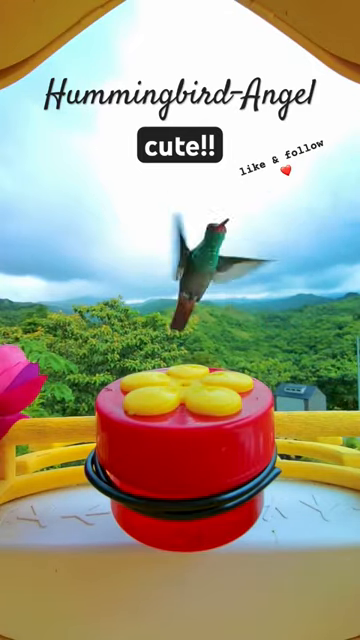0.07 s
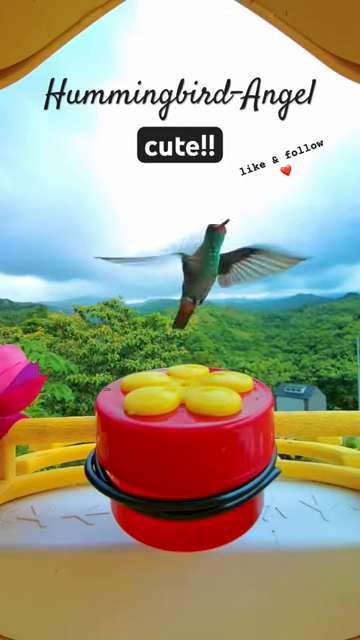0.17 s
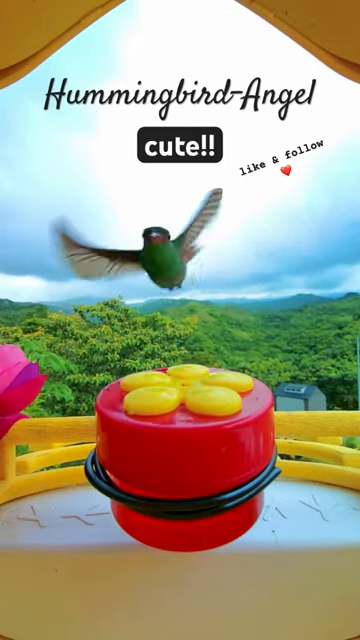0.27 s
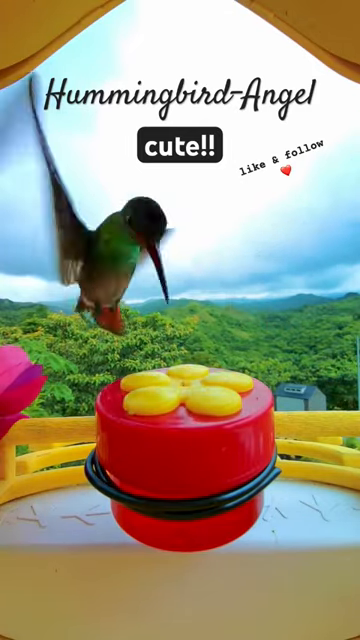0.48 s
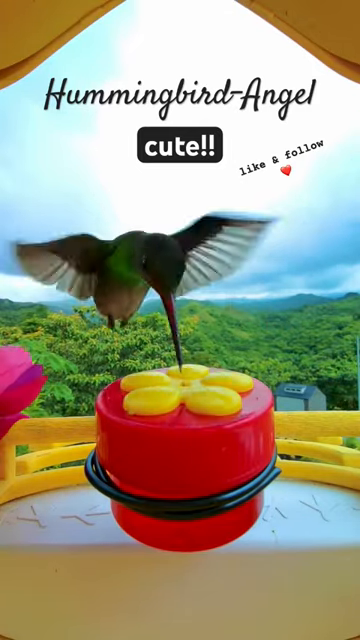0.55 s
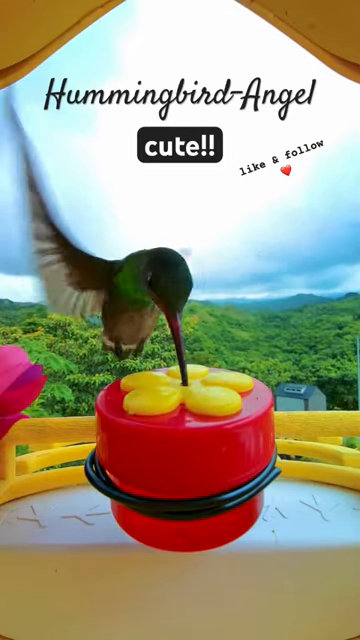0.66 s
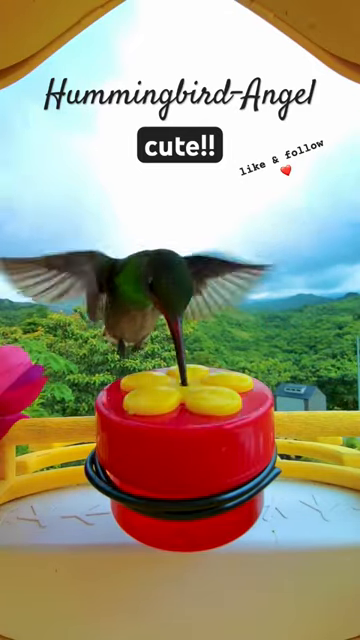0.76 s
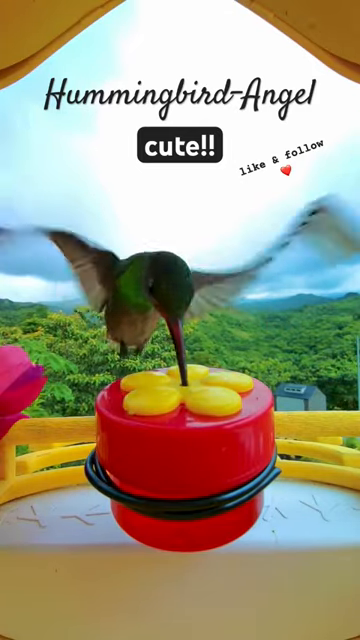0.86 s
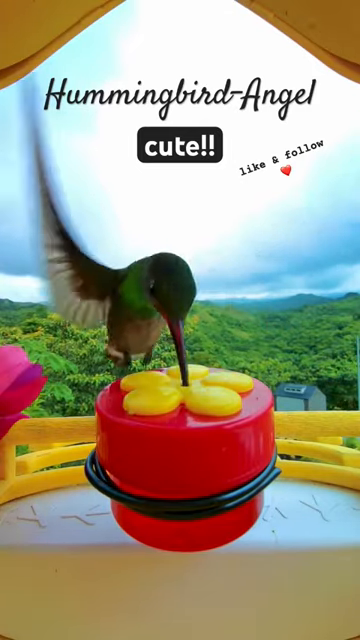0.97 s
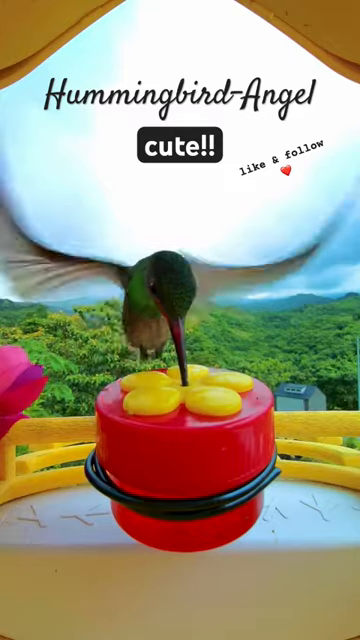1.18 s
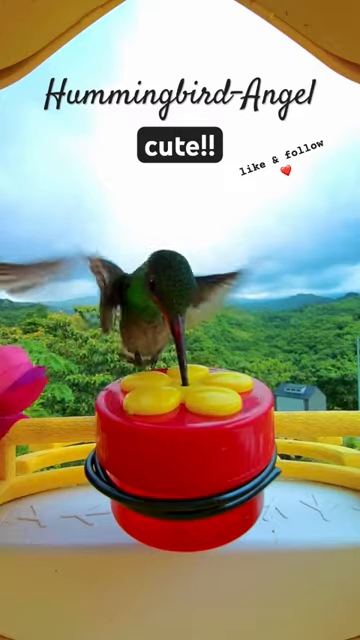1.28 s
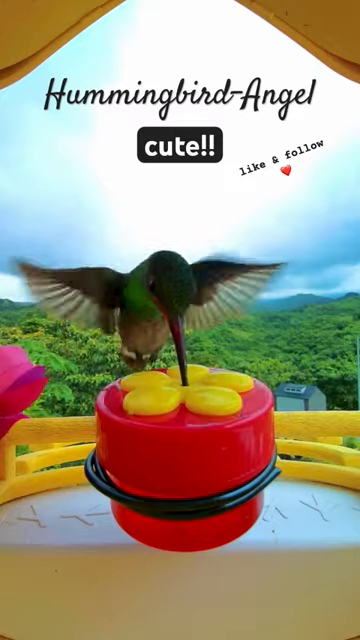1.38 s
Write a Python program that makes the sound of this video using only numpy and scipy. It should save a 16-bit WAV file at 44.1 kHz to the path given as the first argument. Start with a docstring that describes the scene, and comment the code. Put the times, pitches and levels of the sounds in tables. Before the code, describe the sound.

Hummingbird wings hum in fast, low, fluttering thumps close up, with one short sharp chirp early on

```python
"""Outdoors at a feeder, a small microphone hears faint distant hiss throughout.
A hummingbird flies in, its wingstrokes thumping the air about 33 times a second in a swirl of downwash.
On the way in comes a short faint hiss, then one falling chirp: harmonics shaped by the throat, with
noise for its rough end. A diffuse tail from the trees rings on briefly under a dying haze, while
the bird hovers right in front of the microphone, each stroke a short ringing push and pull of air."""
import sys
import numpy as np
from scipy import signal
from scipy.fft import rfft, irfft
from scipy.io import wavfile
from scipy.ndimage import uniform_filter1d

SR = 44100
rng = np.random.default_rng(int(sys.argv[2]) if len(sys.argv) > 2 else 0)


def volts_from_db(level):
    """Convert decibel levels to linear amplitude ratios."""
    exponent = np.asarray(level, float) / 20
    return 10 ** exponent


def store_pcm(level_fs):
    """Save levels as 16-bit WAV."""
    pcm = np.round(np.clip(level_fs, -1, 1) * 32767).astype(np.int16)
    wavfile.write(sys.argv[1], SR, np.atleast_2d(pcm).T)


N = 63945  # samples, 1.45 s


def unit(x):
    """Scale to an rms of 1."""
    return x / np.sqrt(np.mean(x ** 2))


def shape_db(points, hz):
    """Read a spectrum (frequency [Hz], level [dB]) along a log-frequency axis."""
    p = np.array(points, float)
    return np.interp(np.log(np.maximum(hz, 1)), np.log(p[:, 0]), p[:, 1])


def colour(x, points):
    """Filter by a spectrum (frequency [Hz], level [dB])."""
    hz = np.arange(len(x) // 2 + 1) * SR / len(x)
    return irfft(rfft(x) * volts_from_db(shape_db(points, hz)), len(x))


def resonance(x, hz, width_hz):
    """A single resonant peak."""
    return signal.lfilter(*signal.iirpeak(hz, hz / width_hz, fs=SR), x)


def butter(x, order, hz, kind):
    """Butterworth filter run both ways, so that it shifts nothing in time."""
    return signal.sosfiltfilt(signal.butter(order, hz, kind, fs=SR, output="sos"), x)


def walk(rate):
    """Random levels held for 1 / rate seconds, then smoothed twice; rms of 1."""
    hold = int(SR / rate)
    steps = np.repeat(rng.standard_normal(N // hold + 1), hold)
    return unit(uniform_filter1d(uniform_filter1d(steps, hold), hold)[:N])


# Spectrum of the open air around the feeder: (frequency [Hz], relative level [dB])
AIR_SPECTRUM = [(30, -4), (100, -8.5), (300, -9.5), (700, -3), (1500, -9.5), (3000, -10), (5500, -9.5),
                (9000, -11.5), (15000, -14.5)]


def air(t):
    """Smooth distant hiss: coloured noise, a little louder once the bird is near."""
    level_db, near_rise_db, waver_db = -69.5, 1.5, .5
    near = np.clip((t - .2) / .1, 0, 1)
    hiss = unit(colour(rng.standard_normal(N), AIR_SPECTRUM))
    return hiss * volts_from_db(level_db + near_rise_db * near + waver_db * walk(8.4))


def surroundings(voice, t):
    """The chirp returns from the trees as a diffuse fading tail, with a broad haze that dies away."""
    tail_start_s, tail_db, tail_t60_s = 0.06, -39, 0.66
    haze_db, haze_t60_s = -57, 1  # haze level at the end of the chirp
    echoes = rng.standard_normal(N) * volts_from_db(-60 * t / tail_t60_s) * (t > tail_start_s)
    echoes = volts_from_db(tail_db) * echoes / np.linalg.norm(echoes)
    tail = signal.fftconvolve(voice, echoes)[:N]
    since_end = t - CHIRP_COURSE[-1][0]
    haze = unit(colour(rng.standard_normal(N), AIR_SPECTRUM)) * volts_from_db(haze_db - 60 * since_end / haze_t60_s)
    return tail + haze * (t > CHIRP_COURSE[1][0])


# Faint hiss leading into the chirp: (time [s], level [dB])
LEAD_IN_LEVEL = [(.2185, -75), (.2205, -49.5), (.2245, -54), (.2285, -46.5), (.2305, -57.5), (.2355, -53),
                 (.2370, -77)]


def lead_in(t):
    """A short faint hiss just before the chirp: noise through two broad resonances."""
    time, level_db = np.array(LEAD_IN_LEVEL).T
    noise = rng.standard_normal(N)
    hiss = unit(resonance(resonance(noise, 4600, 2500), 5500, 5000)) + .15 * noise
    return volts_from_db(np.interp(t, time, level_db, left=-120, right=-120)) * hiss


# Course of the chirp:
# (time [s], pitch [Hz], level [dB], roughness [0-1], gain of the treble [dB])
CHIRP_COURSE = [(.2355, 1560, -55.5, .4, -12), (0.2362, 1562, -27, .4, -15),
                (.2400, 1554, -21.5, .4, -12.5), (.2408, 1260, -21.5, .45, -15),
                (.2450, 1160, -21, .3, -13), (.2500, 1111, -19.5, .2, -6), (.2540, 1063, -20, .2, 3),
                (0.254, 1062, -25.5, 0.6, 0.5), (.2610, 1033, -26, 0.6, 6.5), (.2660, 953, -30.5, .8, 1),
                (.2700, 1104, -35, .8, 0.5), (.2750, 1120, -27.5, .7, -0.5), (.2810, 1110, -34.5, .8, 4),
                (.2840, 1100, -47.5, .8, -1), (.2860, 1100, -58, .8, 1)]
# Resonances of the throat: (frequency [Hz], relative level [dB])
THROAT_SPECTRUM = [(400, -62.5), (750, -26.5), (1000, -15.5), (1550, -23.5), (2200, -34), (2700, -27),
                   (3200, -28.5), (3700, -28), (4500, -7.5), (5500, 0), (6300, -7), (7000, -21.5),
                   (7800, -27.5), (10500, -27), (13500, -32), (16000, -50.5)]


def chirp(t):
    """A falling harmonic stack shaped by the throat; roughness trades the lines for a grainy rasp."""
    treble_hz = 7600
    beak_closes_s, closing_s = 0.2593, .004
    time, *columns = np.array(CHIRP_COURSE).T
    hz, level_db, rough, treble_db = [np.interp(t, time, column) for column in columns]
    rough = np.clip(rough, 0, 1)

    phase = 2 * np.pi * np.cumsum(hz * (1 + .006 * walk(400))) / SR  # slightly unsteady pitch
    tone = np.zeros(N)
    for k, start in enumerate(rng.uniform(0, 2 * np.pi, 13), 1):
        line_db = shape_db(THROAT_SPECTRUM, k * hz) + 1.5 * walk(300)  # each harmonic flickers
        tone += volts_from_db(line_db) * np.sin(k * phase + start)
    rasp = unit(colour(rng.standard_normal(N), THROAT_SPECTRUM)) * volts_from_db(1.2 * walk(500))
    voice = np.sqrt(2 - 2 * rough ** 2) * tone + rough * rasp

    treble = butter(voice, 4, treble_hz, "high")
    voice = voice + treble * (volts_from_db(treble_db) - 1)
    # the beak closes and this band [Hz] fades
    shoulder = butter(voice, 2, (5900, 7420), "band")
    voice = voice - 0.81 * shoulder * np.clip((t - beak_closes_s) / closing_s, 0, 1)
    sounding = (t > time[0]) * (t < time[-1])
    return sounding * volts_from_db(level_db) * voice


# Wingstrokes as the bird nears and hovers: (time [s], nominal level [dB], nominal thump pitch [Hz])
STROKES = [(0.0255, -64.5, 200), (0.12, -64, 190), (0.2128, -62.5, 213), (0.239, -62.5, 189),
           (0.268, -45, 170), (0.293, -41.5, 250), (0.3177, -34.5, 223), (0.3471, -40, 222),
           (.4090, -43.5, 185), (0.4379, -44, 219), (0.5008, -51, 165), (0.5313, -47, 150),
           (0.5577, -38, 184), (0.5826, -36, 197.6), (0.6089, -38, 201), (0.6364, -34.5, 195),
           (0.67, -42.5, 199.4), (0.7276, -40, 205), (0.7583, -41, 190), (0.7889, -40, 195),
           (0.8781, -40.5, 210), (0.9084, -41.5, 205), (0.9695, -38, 205), (1.0277, -37.5, 224),
           (1.0584, -42, 240), (1.1482, -36, 210), (1.1770, -40.5, 195), (1.2061, -38, 195),
           (1.2373, -37.5, 197), (1.3284, -39.5, 210.7), (1.4223, -40, 187), (1.4540, -45, 195)]
# Which stroke each row above is, those between being spread evenly: (stroke number [count from 0])
STROKE_NUMBER = [0, 3, 6, 7, 8, 9, 10, 11, 13, 14, 16, 17, 18, 19, 20, 21, 22, 24, 25, 26, 29, 30, 32, 34,
                 35, 38, 39, 40, 41, 44, 47, 48]


def thumps(t):
    """Each stroke pushes and pulls the air, a burst that rings out in a cycle or two."""
    jitter_s, scatter_db, pitch_scatter = 0.00017, 1.5, .04  # pitch scatter as a fraction
    rise_s, ring_s, peak_late_s = .0026, .0017, .0006
    windup_s, windup_width_s, windup_db = .0073, .0018, -15  # lead, width, level against the stroke
    number = np.arange(STROKE_NUMBER[-1] + 1)
    time, level_db, hz = [np.interp(number, STROKE_NUMBER, column) for column in np.array(STROKES).T]
    chance = rng.standard_normal((3, len(number)))
    time = time + jitter_s * chance[0]
    size = volts_from_db(level_db + scatter_db * chance[1])
    hz = hz * np.exp(pitch_scatter * chance[2])
    out = np.zeros(N)
    for when, gain, pitch in zip(time, size, hz):
        u = t - when
        late = u - peak_late_s
        rise = np.exp(-(np.minimum(late, 0) / rise_s) ** 4)
        ring = np.exp(1 - np.hypot(1, late / ring_s))
        stroke = 1.097 * np.where(late < 0, rise, ring) * np.sin(2 * np.pi * pitch * u)
        # a slower suction just ahead of the stroke
        windup = volts_from_db(windup_db) * np.exp(-((u + windup_s) / windup_width_s) ** 2 / 2)
        out -= gain * (stroke + windup)
    return out


def downwash(t):
    """Turbulent swirl under the wings: low resonant noise that follows the strokes' smoothed level."""
    swirl_hz, width_hz, top_hz = 170, 134, 366
    below_stroke_db, flicker_db = -19.5, 2.5
    time, level_db, _ = np.array(STROKES).T
    swirl = resonance(rng.standard_normal(N), swirl_hz, width_hz)
    swirl = unit(signal.sosfilt(signal.butter(6, top_hz, fs=SR, output="sos"), swirl))
    smooth_db = uniform_filter1d(np.interp(t, time, level_db), size=1300)  # over about 29 ms
    return swirl * volts_from_db(smooth_db + below_stroke_db + flicker_db * walk(59.58))


def wings(t):
    """Thumps and downwash right in front of the microphone, without the rumble below 31 Hz."""
    return butter(thumps(t) + downwash(t), 2, 31, "high")


def scene():
    """Air, trees and bird together, in mono."""
    t = np.arange(N) / SR
    voice = chirp(t)
    mix = air(t) + surroundings(voice, t) + lead_in(t) + voice + wings(t)
    return mix[None, :]


def low_pass(x):
    """Removes everything above the highest recorded frequency."""
    return signal.sosfilt(signal.butter(12, 15420, fs=SR, output="sos"), x)


def record(dry):
    """The small camera's microphone channel cuts the top above 14.9 kHz with a steep low-pass."""
    cut = signal.sosfilt(signal.ellip(6, .5, 40, 14900, fs=SR, output="sos"), dry)
    return low_pass(cut)


dry = scene()
out = record(dry)
store_pcm(out)
```